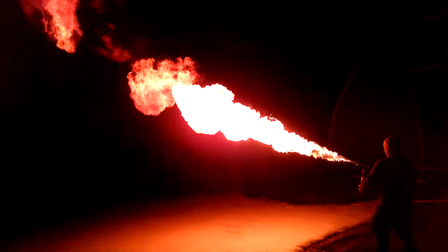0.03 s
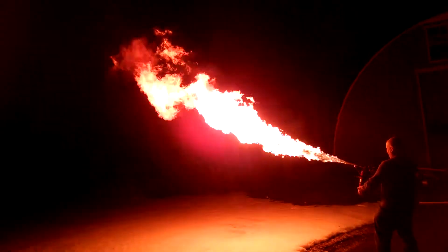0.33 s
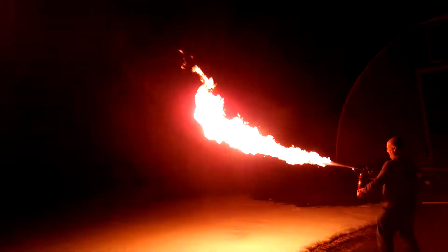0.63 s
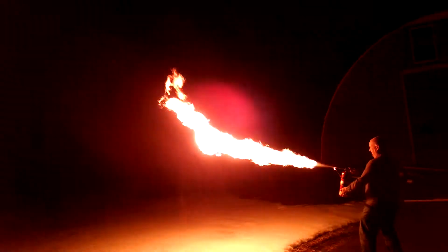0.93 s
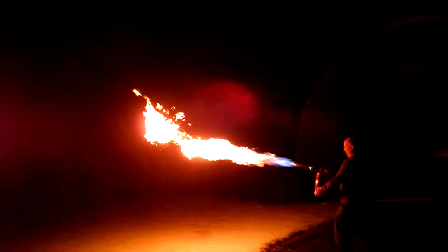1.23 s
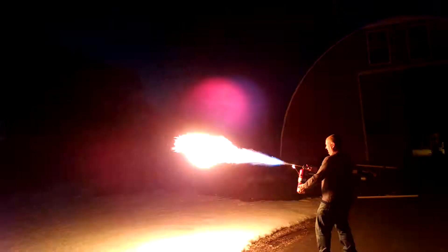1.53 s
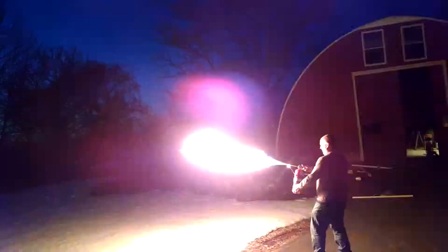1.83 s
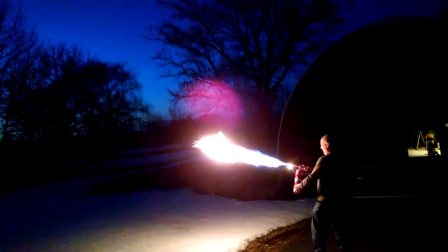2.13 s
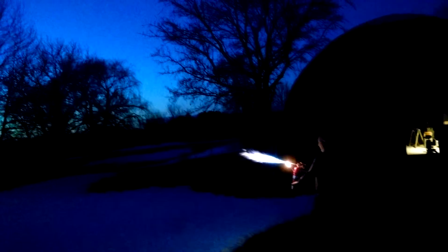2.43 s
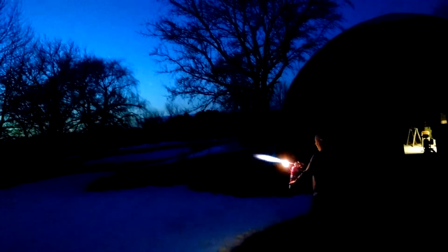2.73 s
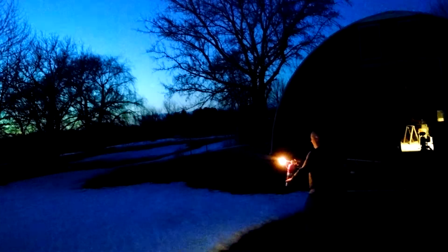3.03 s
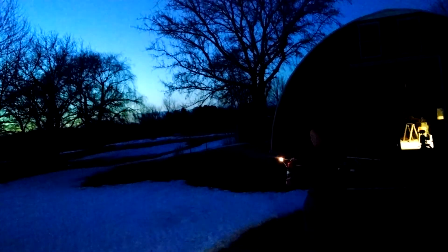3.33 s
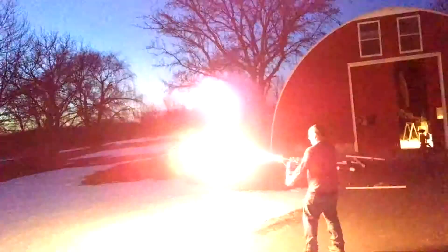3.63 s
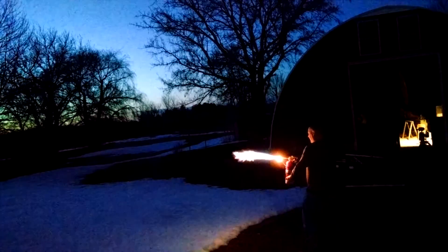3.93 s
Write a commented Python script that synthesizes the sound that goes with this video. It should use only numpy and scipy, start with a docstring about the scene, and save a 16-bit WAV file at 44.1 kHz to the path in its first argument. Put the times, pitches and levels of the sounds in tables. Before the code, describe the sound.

A flamethrower's rumbling, fluttering jet burns close by in the open air, then breaks into spurts and drops away. The nozzle keeps hissing, pops and gives a short, faint whistle before the flame bursts back louder.

```python
"""A handheld flamethrower roars outdoors, a few metres away.
Pockets of fuel flare and collapse over the rumble of the plume. The flame sputters and dies back
to the hiss of gas in the nozzle; it coughs, the nozzle whistles briefly and the jet catches again.
An echo off the ground hollows out flame and hiss. A faint high whine runs throughout."""
import sys
import numpy as np
from scipy import signal
from scipy.fft import rfft, irfft
from scipy.io import wavfile
from scipy.ndimage import uniform_filter1d, map_coordinates

SR = 44100
rng = np.random.default_rng(int(sys.argv[2]) if len(sys.argv) > 2 else 0)


def wav_record(signal):
    """Record a signal, one row per channel, as 16-bit PCM in the file named by sys.argv[1]."""
    frames = np.transpose(np.atleast_2d(signal))
    bounded = np.clip(frames, -1, 1)
    # unit amplitude maps onto the largest positive 16-bit level
    quanta = np.round(bounded * 32767).astype(np.int16)
    wavfile.write(sys.argv[1], SR, quanta)


N = 176400
T, HZ = np.arange(N) / SR, np.fft.rfftfreq(N, 1 / SR)

# Flame strength. Each row: time in seconds, roar in dB, rumble in dB.
BURN = [(0, -24, -22), (.08, -20, -24), (.25, -21.5, -23.5), (.35, -22, -29.5), (.46, -21, -26.5),
        (.6, -23.5, -23.5), (.71, -23, -29), (.76, -28, -24.5), (.86, -20, -22.5), (.92, -25.5, -24),
        (.99, -23.5, -26), (1.07, -26, -25), (1.2, -24.5, -26), (1.35, -21, -22), (1.58, -20, -25.5),
        (1.825, -19.5, -20.5), (1.87, -31.5, -25), (1.925, -31.5, -28.5), (1.943, -19, -21.5),
        (2.03, -20.5, -22), (2.115, -32.5, -29), (2.143, -31, -24), (2.157, -20, -19), (2.21, -22, -27),
        (2.32, -22.5, -30), (2.34, -35, -36), (2.375, -42, -36), (2.386, -22, -27.5), (2.47, -24.5, -39),
        (2.54, -19, -26.5), (2.67, -26, -29.5), (2.72, -21, -36), (2.81, -27.5, -32), (2.9, -24, -39),
        (2.92, -38, -37), (3.0, -43, -48), (3.25, -70, -65), (3.5, -62, -48), (3.746, -41.5, -48),
        (3.757, -17.5, -13), (3.81, -15.5, -27), (3.84, -20.5, -24), (3.88, -15, -29), (4, -16, -28)]
# Fuel pockets. Each row: collapse time in seconds, roar and thump in relative dB,
# build-up in seconds, snap's share of the energy 0-1.
FLARES = [(.171, -11.5, -13, .018, 0.12), (0.22, -32, -25, 0.0032, 0.4), (0.396, -13.5, -13.5, 0.015, .2),
          (.417, -22.5, -32, 0.012, 0), (0.515, -14.5, -17, 0.0092, 0), (0.612, -16, -31, 0.0082, 0.06),
          (.694, -20, -17, 0.009, 0.14), (0.717, -14.5, -10.5, 0.009, 0.2), (.844, -19, -21, 0.0041, 0.4),
          (.866, -17, -9, 0.0061, 0.34), (1.026, -17, -10, 0.0093, 0.35), (1.14, -13, -6.5, 0.0092, 0),
          (1.361, -15.5, -21, 0.0063, 0.4), (1.387, -16, -21, 0.018, 0.13), (1.477, -15, -22, 0.011, 0.4),
          (1.562, -15.5, -28, 0.0038, 0.03), (1.601, -25.5, -27, 0.0056, .3),
          (1.673, -13.5, -30, 0.0039, 0.8), (1.713, -23, -25, 0.0052, 0.6), (1.735, -15, -10, 0.0083, 0.2),
          (1.759, -16, -27, .002, 0.54), (1.782, -19, -25, 0.0054, 0.4), (1.817, -14, -18, 0.0075, 0.02),
          (1.947, -16.5, -19, 0.0044, 0.03), (1.976, -20, -29, 0.0061, 0.03), (2.014, -19, -32, 0.0076, 0),
          (2.159, -14, -13, 0.0042, 0.03), (2.219, -22, -29, 0.0023, 0), (2.244, -13, -6, 0.013, 0.1),
          (2.295, -21, -24, 0.0035, 0.3), (2.319, -20.5, -23, 0.0062, .3),
          (2.389, -21.5, -17, 0.0033, 0.23), (2.518, -22, -26, 0.0037, 0), (2.655, -23.5, -32, 0.0025, 0.1),
          (2.9, -32, -27, 0.0065, 0.03), (3.3, -14, -17, 0.0055, 0.2), (3.344, -19.5, -16.5, 0.0056, 0.2),
          (3.377, -31, -23, 0.006, 0), (3.421, -39, -26.5, 0.0046, 0.1), (3.502, -41, -31, .005, 0),
          (3.625, -30.5, -30, 0.0018, 0.3), (3.759, -21, -16, 0.0039, .2), (3.766, -17, -9.5, 0.0029, 0.1),
          (3.79, -17, -18, 0.0066, 0.4), (3.82, -16.5, -22, 0.0039, 0.3), (3.995, -24, -24, 0.0064, 0.24)]
# Flame spectra. Each row: frequency in Hz, relative level in dB.
ROAR_SPECTRUM = [(30, -23), (110, -9), (220, -1.5), (300, 1.5), (430, 0.8), (600, -6), (850, -9),
                 (1300, -14.5), (1800, -19), (2400, -27.5), (3500, -27.5), (6000, -36.5), (15000, -45)]
RUMBLE_SPECTRUM = [(10, -16), (24, -7), (42, 0.5), (85, -.5), (120, -2.5), (170, -2), (260, -16.5),
                   (600, -31), (3000, -64)]
# Stereo image of flame and throttled hiss. Each row: frequency in Hz, then, by table,
# left phase lead in radians, left minus right in dB, or left-right likeness 0-1.
LEAD_RAD = [(30, -.5), (120, -.2), (400, 0), (1900, -.05), (2450, -3.1), (2700, -2.6), (3200, -.2),
            (4000, -.3), (4850, -3.1), (5400, -3.1), (5900, 0), (6500, .3), (7100, -2.7), (8100, -3.1),
            (9200, -.2), (10000, 2.5), (11000, 2.3), (12900, 2), (14400, -1), (15500, -4.5)]
BALANCE_DB = [(25, 1), (60, 1.5), (150, -3.5), (500, -.5), (2300, -0.5), (3300, -2), (4400, 2.5),
              (5800, -2), (7200, -2), (8200, 0.5), (9500, 1.5), (11500, 4), (13200, -1.5), (15500, 9)]
LIKENESS = [(50, 0.8), (500, 0.99), (1100, 1), (1750, 1), (2150, .15), (2450, 1), (2850, 0), (3600, 1),
            (4000, 0.7), (4450, 0.78), (5050, 1), (5650, 0.86), (6200, 0.86), (6750, 0.2), (7400, 0.77),
            (8000, 1), (8700, 0.64), (9300, 0.6), (10500, 0.71), (11300, 0.17), (12200, 0), (13200, .5),
            (15000, 0.8)]


def flame():
    """Roar, flares and rumble with their ground echo and outdoor tail, plus rasp."""
    # A compact flame echoes clearly, a long one blurs. Each row: time in seconds, echo gain.
    echo_gain = [(0, 0.68), (1.3, 0.53), (2.4, 0.51), (3.2, .85), (3.7, 0.47), (3.85, 0.76)]
    # A long flame lengthens the echo path. Each row: time in seconds, delay factor.
    echo_path = [(0, 1.05), (1.2, 1.06), (1.8, 1.05), (2.6, 1.02), (3.3, 1), (4, 1)]
    fire = spread(roar(), roar(), LIKENESS) + plume_size(flares() + rumble())
    echoed = np.array([ground(x, curve(echo_gain)[0], curve(echo_path)[0]) for x in fire])
    return scatter(echoed) + spread(rasp(), rasp(), LIKENESS)


def roar(collapses_per_s=1800, pop_share=0.42):
    """Countless small flame pockets collapse, each a pulse of suction, over churning noise."""
    pops = -rng.exponential(1, N) * (rng.random(N) < collapses_per_s / SR)
    churn = rng.standard_normal(N)
    drive = np.sqrt(pop_share) * unit_rms(pops - pops.mean()) + np.sqrt(1 - pop_share) * churn
    drive = unit_rms(drive * eddies(low_hz=2, high_hz=43.7, depth_db=1.25)) * amp(curve(BURN)[0])
    return signal.oaconvolve(drive, pulse(ROAR_SPECTRUM))[:N]


def flares(release_s=0.0037, roar_trim_db=-1.2, thump_trim_db=-5.5):
    """Each fuel pocket swells with noise, then collapses in a sharp pulse of suction."""
    out, lead_in = np.zeros(N), SR // 20
    t = np.arange(-lead_in, lead_in) / SR
    pulses = pulse(ROAR_SPECTRUM) * amp(roar_trim_db), pulse(RUMBLE_SPECTRUM) * amp(thump_trim_db)
    for collapse_s, roar_db, thump_db, build_s, snap in FLARES:
        swell = np.exp(np.minimum(t / build_s, -t / release_s))
        for wave, db in zip(pulses, (roar_db, thump_db)):
            churn = signal.fftconvolve(swell * rng.standard_normal(len(t)), wave)
            burst = np.sqrt(1 - snap) * churn * np.linalg.norm(wave) / np.linalg.norm(churn)
            add(burst, lead_in / SR, -np.sqrt(snap) * wave)
            add(out, collapse_s - lead_in / SR, burst * amp(db) * np.sqrt(SR / 100))
    return out


def rumble():
    """The whole plume heaves, a little differently left and right."""
    heave = rng.standard_normal(N) + 0.6 * rng.standard_normal((2, N))
    drive = unit_rms(heave * eddies(low_hz=8.7, high_hz=35, depth_db=0.5)) * amp(curve(BURN)[1])
    return signal.oaconvolve(drive, pulse(RUMBLE_SPECTRUM)[None], axes=1)[:, :N]


def plume_size(pair, corner_hz=58.5):
    """The deepest bass needs a large plume."""
    # Each row: time in seconds, bass gain in dB.
    bass_db = [(0, -1), (.7, 4), (1.3, -1), (1.9, -1), (2.25, -7), (2.55, -10), (3.0, -7), (3.5, -5),
               (3.8, -6), (4, -9)]
    bass = irfft(rfft(pair) / (1 + (HZ / corner_hz) ** 6), N)
    return pair + bass * (amp(curve(bass_db)[0]) - 1)


def rasp(echo_s=0.002935, climb_s_per_s=0.003, echo_gain=0.64):
    """The flame tears at the air; its echo lags more as it climbs, a faint falling sweep."""
    # Each row: frequency in Hz, relative level in dB.
    spectrum = [(100, -41), (450, 4), (700, 4.5), (1200, -7.5), (1800, -2.5), (2600, -12.5), (4000, -20),
                (8000, -42), (15000, -35)]
    # Strongest when rich in fuel. Each row: time in seconds, level in dB.
    level_db = [(0, -41), (.25, -36), (.38, -30.5), (.5, -35), (.61, -22), (.7, -36), (.8, -31),
                (1.2, -37.5), (1.6, -48), (2.55, -38.5), (2.9, -34.5), (2.93, -51), (3.745, -65),
                (3.76, -30), (4, -31)]
    drive = rng.standard_normal(N) * eddies(low_hz=20, high_hz=121, depth_db=3)
    tear = signal.oaconvolve(drive, pulse(spectrum))[:N]
    late = np.interp(T - echo_s - climb_s_per_s * T, T, tear)
    return unit_rms(tear + echo_gain * late) * amp(curve(level_db)[0])


def nozzle(open_db=2.3, throttled_db=1.33):
    """The hiss follows the gas flow, flutters, and changes colour as the jet is throttled."""
    # Each row: time in seconds, relative hiss level in dB.
    flow_db = [(0, -30.5), (0.16, -29), (0.24, -30.5), (0.55, -27), (0.85, -31), (0.95, -33), (1.12, -31.5),
               (1.22, -34), (1.35, -31.5), (1.75, -31), (1.85, -36), (2.23, -32), (2.28, -36.5),
               (2.45, -36.5), (2.58, -32), (2.7, -36), (3.05, -35.5), (3.27, -30), (3.45, -28),
               (3.62, -26.5), (3.73, -26), (3.8, -29), (4.0, -29.5)]
    # Each row: time in seconds, open jet's share of the power 0-1.
    opening = [(0, 1), (.8, 0.87), (1.3, 0.07), (2.2, 0), (3.0, 0.08), (4, 0)]
    # Each row: frequency in Hz, relative level in dB.
    open_spectrum = [(100, -10), (700, 1), (1500, -2.5), (2200, -10), (3000, -2), (4100, -7.5), (4700, -4),
                     (5350, 4), (5900, -5), (6500, -2), (7800, -5.5), (9300, -4), (10700, -7), (12200, -8),
                     (14200, -9.5), (15500, -15)]
    throttled_spectrum = [(20, -6), (80, -3), (180, -8), (400, -12.5), (800, -8.5), (1900, -1.5),
                          (2500, -5.5), (3200, -0.5), (4200, 1.5), (5200, 3), (5900, -1.5), (6700, -1.5),
                          (7500, 2), (8700, 0), (9500, -3.5), (10700, 1.5), (12200, -4), (13400, -5.5),
                          (14300, -5), (15500, -6)]
    # Stereo image of the open jet. Rows as in LEAD_RAD, BALANCE_DB and LIKENESS.
    open_lead_rad = [(30, 0), (1500, 0), (2000, -1.4), (2400, -3.1), (2850, -3.1), (3400, 0), (3850, 0),
                     (4350, -3.1), (5550, -3.1), (6100, -6.3), (7060, -6.2), (7600, -4.3), (8300, -4.8),
                     (9390, -6.8), (10200, -3.3), (12100, -2.8), (13700, -4.2), (15000, -9)]
    open_balance_db = [(500, 1), (3000, -3), (4400, -1), (5300, -1.5), (5800, -3), (7200, -3), (8000, 7),
                       (9700, 10), (10800, 5), (12000, 3.5), (15500, 5)]
    open_likeness = [(50, 0.2), (1200, 0.97), (1950, 0.5), (2500, 1), (2950, 1), (3500, 0.3), (4000, 0.5),
                     (4800, 1), (5350, 1), (5850, .3), (6400, .98), (6800, .98), (7300, 0.3), (8000, 0.7),
                     (9800, 0.16), (11300, 0.74), (15000, 0)]
    wide = hiss(open_spectrum, open_lead_rad, open_balance_db, open_likeness, echo_gain=0.14)
    narrow = hiss(throttled_spectrum, LEAD_RAD, BALANCE_DB, LIKENESS, echo_gain=0.44)
    share = np.clip(curve(opening)[0], 0, 1)
    gas = amp(open_db) * np.sqrt(share) * wide + amp(throttled_db) * np.sqrt(1 - share) * narrow
    gas = treble_drift(shimmer(gas))
    return gas * amp(curve(flow_db)[0]) * spurts() * eddies(low_hz=1.9, high_hz=25.5, depth_db=0.87)


def hiss(spectrum, lead_rad, balance_db, likeness, echo_gain):
    """Gas hiss from the nozzle, given a left-right image that is wide in some bands and centred in others."""
    a, b = (swing(ground(rng.standard_normal(N), echo_gain)) for _ in range(2))
    gas = irfft(rfft(spread(a, b, likeness)) * amp(at_hz(spectrum, HZ)), N)
    return unit_rms(stereo_image(gas, lead_rad, balance_db))


def shimmer(pair, depth_db=1.22):
    """Narrow bands swell and fade at random."""
    bands = signal.stft(pair, nperseg=512, noverlap=384)[2]
    patches = uniform_filter1d(rng.standard_normal(bands.shape[1:]), size=4, axis=0)
    patches = uniform_filter1d(patches, size=45, axis=1)
    return signal.istft(bands * amp(depth_db * unit_rms(patches)), nperseg=512, noverlap=384)[1][:, :N]


def treble_drift(pair, corner_hz=7360):
    """The hiss brightens and dulls."""
    # Each row: time in seconds, treble gain in dB.
    treble_db = [(0, 5.5), (.5, -2), (1.3, 1.5), (1.78, -2.5), (1.85, 6), (2.2, 1), (2.55, -0.5),
                 (2.75, -3), (3.3, 0.5), (3.68, 0.5), (3.8, -9.5), (4, -3)]
    treble = irfft(rfft(pair) / (1 + (corner_hz / (HZ + 1)) ** 6), N)
    return pair + treble * (amp(curve(treble_db)[0]) - 1)


def spurts(strength=1.65, width_s=0.014):
    """Hiss gain: a bump just before each flare collapses, in step with its level."""
    gain = np.ones(N)
    for collapse_s, roar_db, _, build_s, _ in FLARES:
        widths_away = np.minimum(abs(T - collapse_s + build_s) / width_s, 10)
        gain += strength * amp(roar_db) * np.exp(-widths_away ** 2)
    return gain


def whistle():
    """A short, wavering whistle that steps up as fuel returns to the nozzle."""
    # Each row: time in seconds, pitch in Hz, level in dB.
    contour = [(3.625, 1090, -48), (3.638, 1083, -37), (3.655, 1079, -36), (3.665, 1118, -37.5),
               (3.72, 1107, -38.5), (3.74, 1113, -39), (3.755, 1095, -56)]
    hz, db = curve(contour)
    cycles = np.cumsum(hz * eddies(low_hz=20, high_hz=120, depth_db=0.04)) / SR
    sounding = (T > contour[0][0]) & (T < contour[-1][0])
    return np.sqrt(2) * np.sin(2 * np.pi * cycles) * amp(db) * sounding


def whine(hz=14000, rms_db=-61):
    """A faint, steady high tone."""
    return np.sqrt(2) * amp(rms_db) * np.sin(2 * np.pi * hz * T)


def ground(x, echo_gain, path_factor=1):
    """Adds the ground echo; its lag shrinks as the listener moves back."""
    # Each row: time in seconds, base delay in seconds.
    delay_s = [(0, .00228), (2, .00218), (3.3, .00215), (4, .00211)]
    late = map_coordinates(x, [(T - path_factor * curve(delay_s)[0]) * SR], order=3)
    return (x + echo_gain * late) / np.sqrt(1 + echo_gain ** 2)


def swing(x, echo_gain=0.07):
    """A near reflection slides as the gun is swung, making the hiss slightly phasey."""
    # Each row: time in seconds, delay in seconds.
    delay_s = [(0, .0012), (.8, .0017), (2, .0015), (3.1, .00204), (3.7, .00203), (4, .0019)]
    return x + echo_gain * map_coordinates(x, [(T - curve(delay_s)[0]) * SR], order=3)


def scatter(pair, level_db=-20, t60_s=0.15, taps_per_s=2000):
    """A short, thin tail off a shed and trees, different left and right."""
    t = np.arange(SR // 4) / SR
    taps = rng.standard_normal((2, len(t))) * (rng.random((2, len(t))) < taps_per_s / SR)
    taps *= (t > 0.004) * amp(-60 * t / t60_s)
    taps /= np.linalg.norm(taps, axis=1, keepdims=True)
    return pair + amp(level_db) * signal.oaconvolve(pair, taps, axes=1)[:, :N]


def stereo_image(pair, lead_rad, balance_db):
    """Left-right phase and level differences, band by band."""
    side = np.array([[0.5], [-0.5]])
    response = amp(side * at_hz(balance_db, HZ)) * np.exp(1j * side * at_hz(lead_rad, HZ))
    return irfft(rfft(pair) * response, N)


def spread(a, b, likeness):
    """Two unrelated sounds become a partly alike left-right pair."""
    same = np.clip(at_hz(likeness, HZ), 0, 1)
    mid, side = rfft(a) * np.sqrt((1 + same) / 2), rfft(b) * np.sqrt((1 - same) / 2)
    return irfft(np.array([mid + side, mid - side]), N)


def eddies(low_hz, high_hz, depth_db):
    """A gain that flutters at random between two rates."""
    band = HZ / (HZ + low_hz) / np.sqrt(1 + (HZ / high_hz) ** 4)
    return amp(depth_db * unit_rms(irfft(rfft(rng.standard_normal(N)) * band, N)))


def pulse(spectrum, size=4096):
    """Minimum-phase pressure pulse of unit energy with this spectrum."""
    log_gain = np.log(amp(at_hz(spectrum, abs(np.fft.fftfreq(size, 1 / SR)))))
    wave = np.fft.ifft(np.exp(np.conj(signal.hilbert(log_gain)))).real[:size // 2]
    return wave / np.linalg.norm(wave)


def curve(rows):
    """Each value column, interpolated in time."""
    times_s, *columns = np.transpose(rows)
    return [np.interp(T, times_s, column) for column in columns]


def at_hz(rows, hz):
    """A table interpolated over log frequency."""
    knots_hz, values = np.transpose(rows)
    return np.interp(np.log(hz + 1), np.log(knots_hz + 1), values)


def add(mix, start_s, sound):
    """Mixes a sound in place."""
    part = mix[max(round(start_s * SR), 0):][:len(sound)]
    part += sound[:len(part)]


def amp(db):
    """Decibels to gain."""
    return 10 ** (np.asarray(db) / 20)


def unit_rms(x):
    """Scales to an rms of 1."""
    return x / np.sqrt(np.mean(x ** 2) + 1e-20)


def scene():
    """Flame, nozzle hiss, whistle and whine in stereo."""
    return stereo_image(flame(), LEAD_RAD, BALANCE_DB) + nozzle() + whistle() + whine()


def record(dry, left_highpass_hz=141, edge_hz=15550):
    """The left channel loses bass; both channels are band-limited."""
    left = signal.lfilter(*signal.butter(1, left_highpass_hz, "high", fs=SR), dry[0])
    lowpass = signal.firwin(1023, edge_hz, window=("kaiser", 9), fs=SR)
    return signal.oaconvolve(np.array([left, dry[1]]), lowpass[None], "same")


dry = scene()
out = record(dry)
wav_record(out)
```